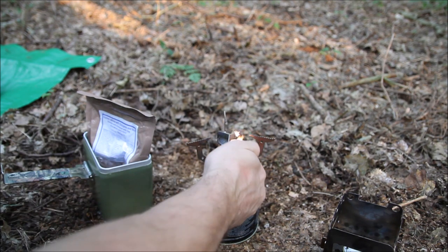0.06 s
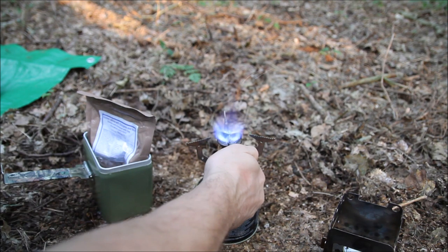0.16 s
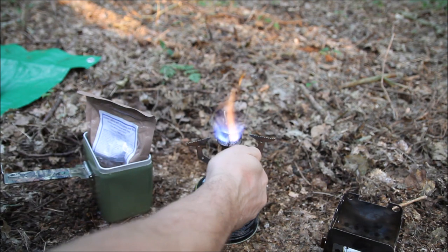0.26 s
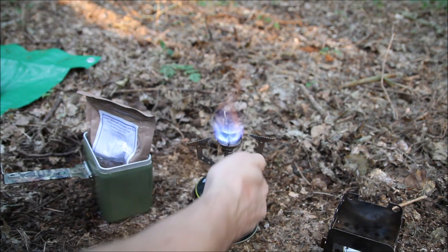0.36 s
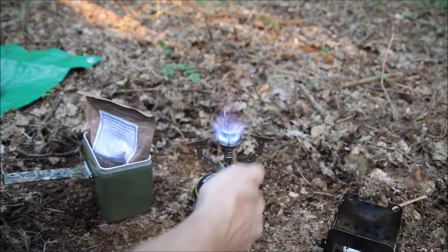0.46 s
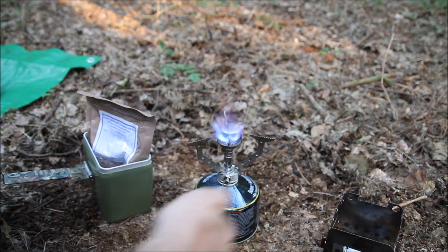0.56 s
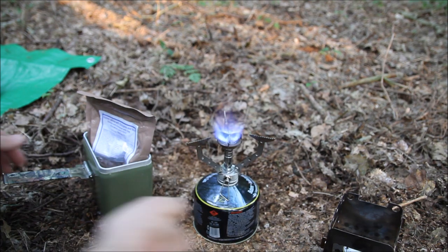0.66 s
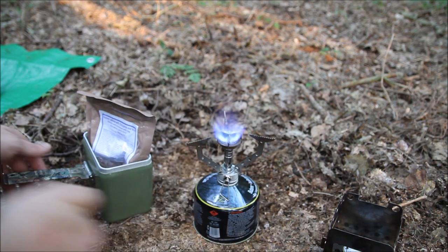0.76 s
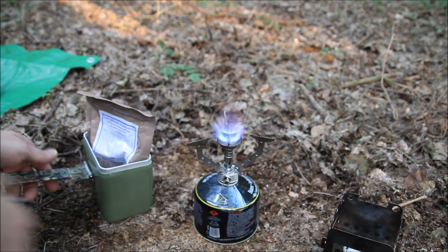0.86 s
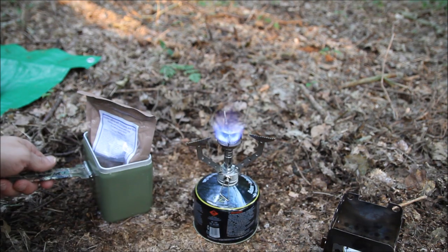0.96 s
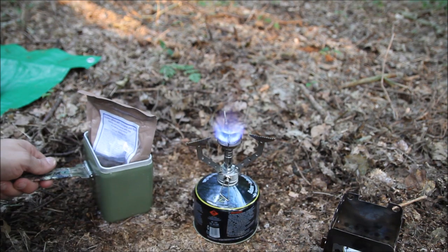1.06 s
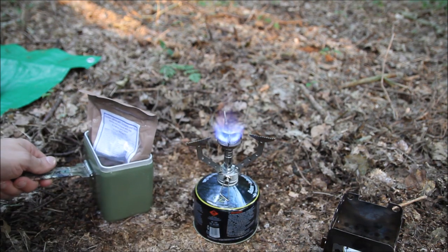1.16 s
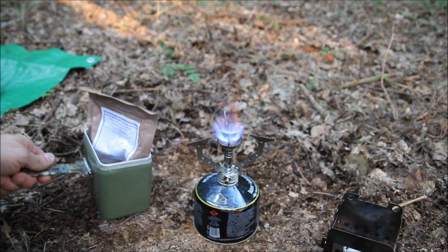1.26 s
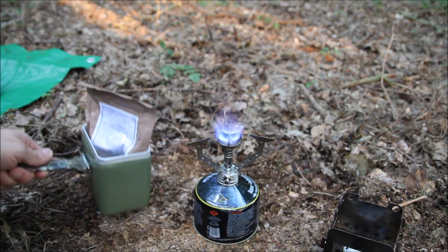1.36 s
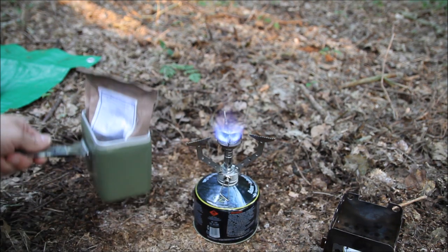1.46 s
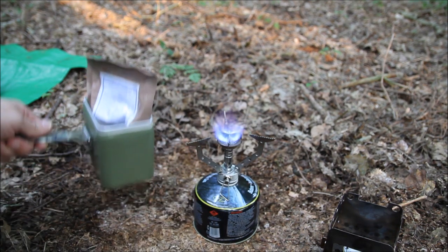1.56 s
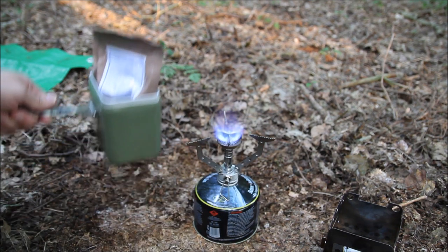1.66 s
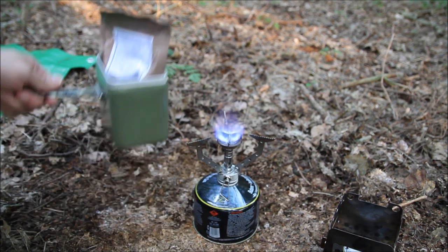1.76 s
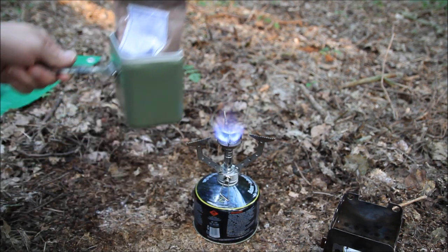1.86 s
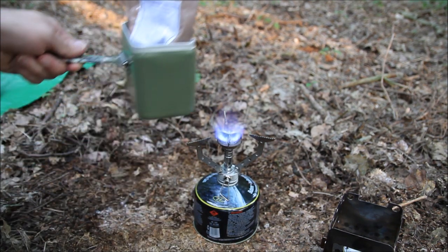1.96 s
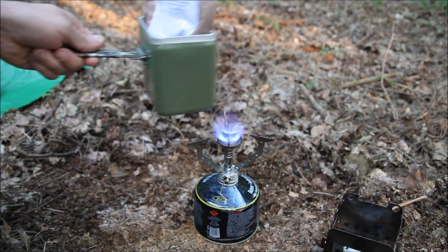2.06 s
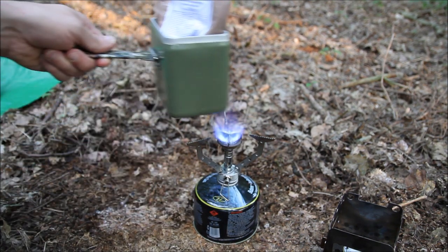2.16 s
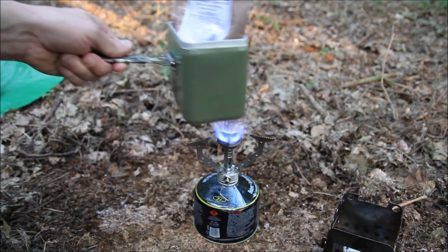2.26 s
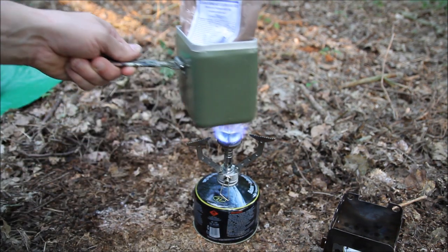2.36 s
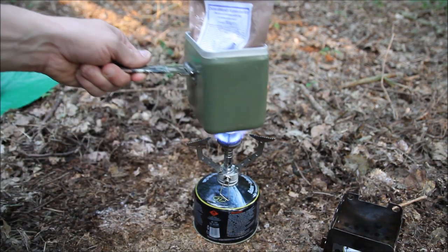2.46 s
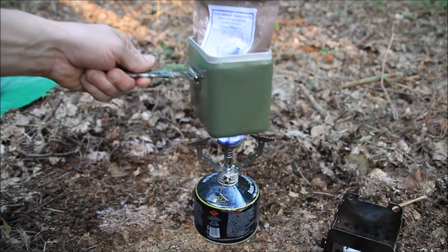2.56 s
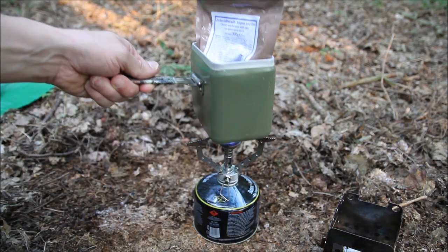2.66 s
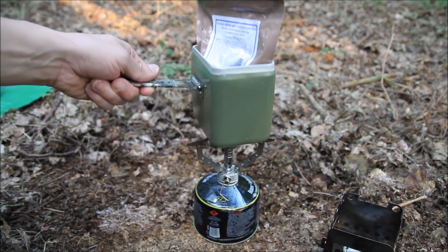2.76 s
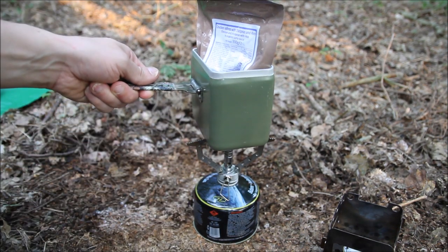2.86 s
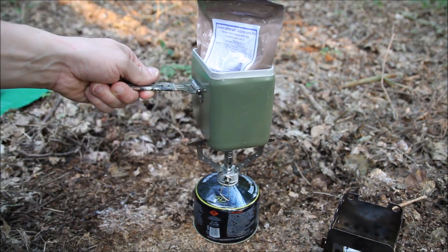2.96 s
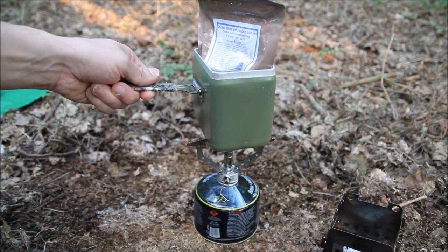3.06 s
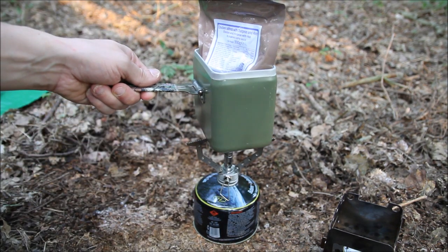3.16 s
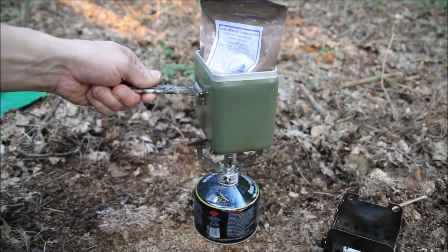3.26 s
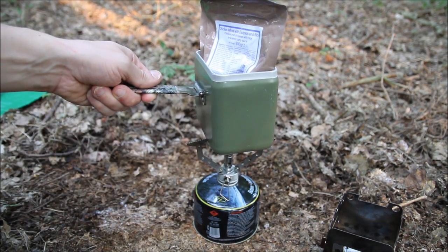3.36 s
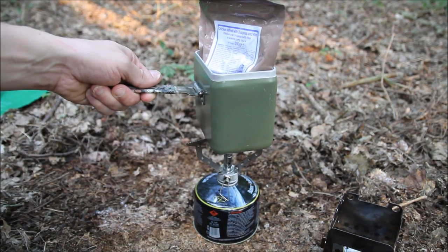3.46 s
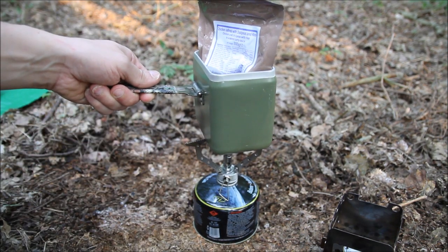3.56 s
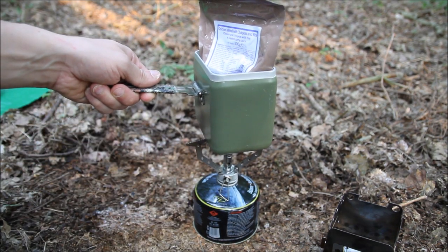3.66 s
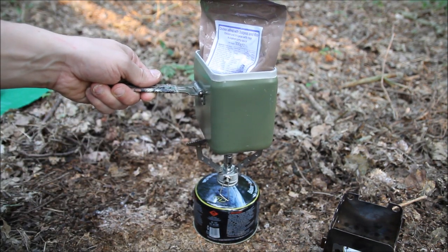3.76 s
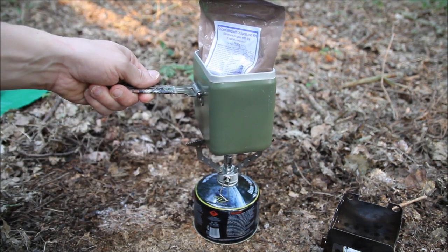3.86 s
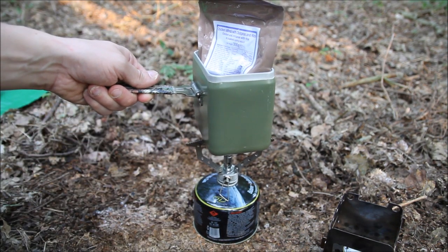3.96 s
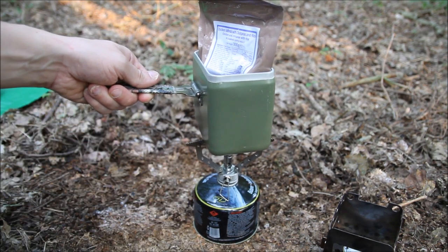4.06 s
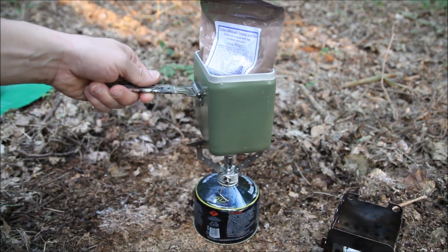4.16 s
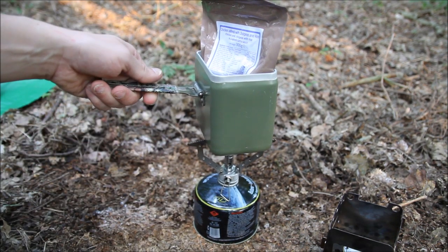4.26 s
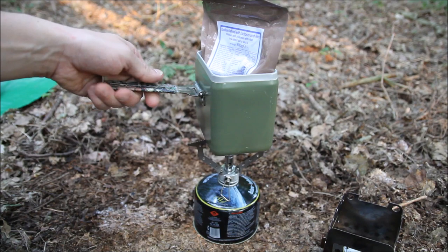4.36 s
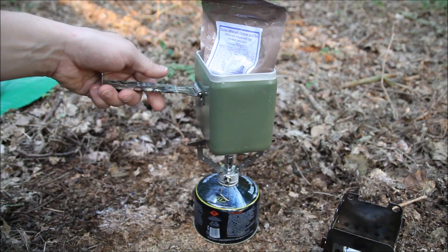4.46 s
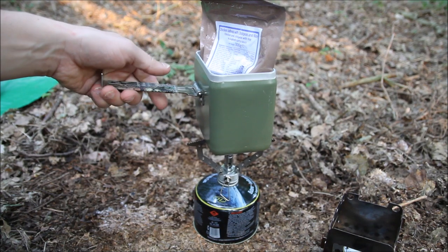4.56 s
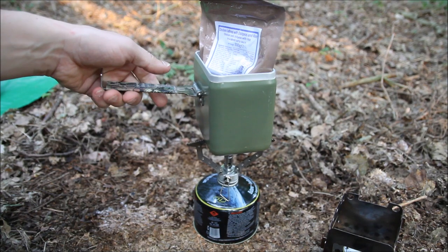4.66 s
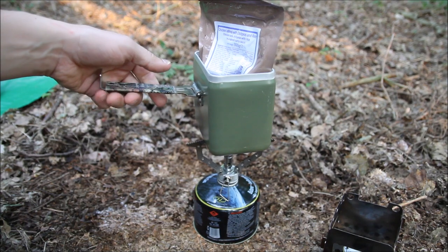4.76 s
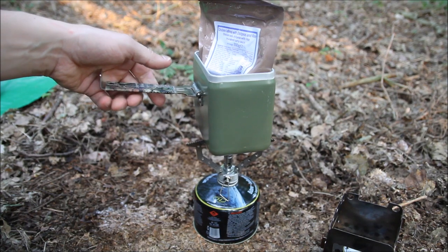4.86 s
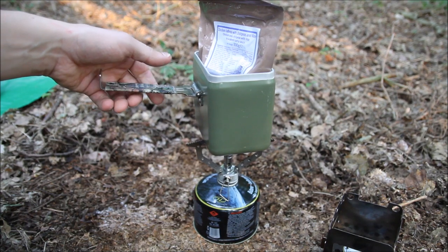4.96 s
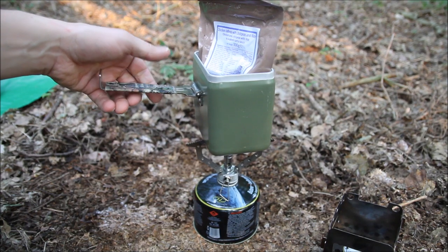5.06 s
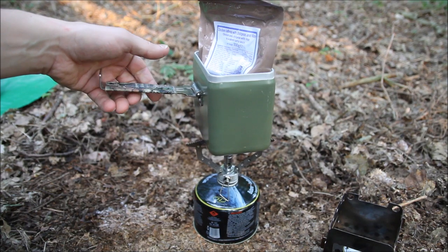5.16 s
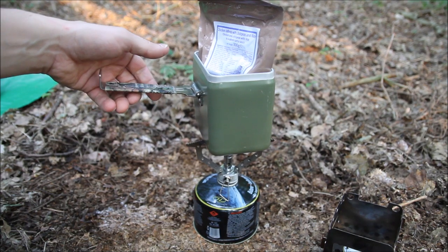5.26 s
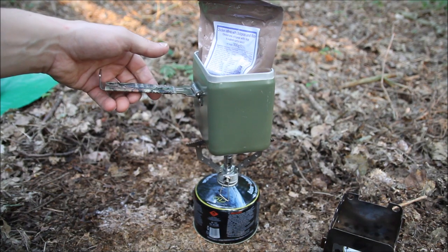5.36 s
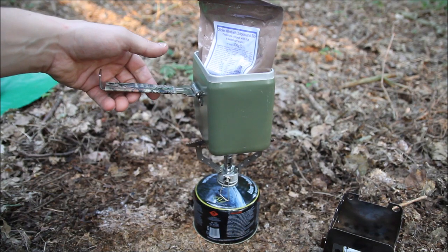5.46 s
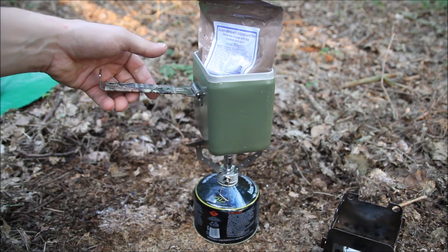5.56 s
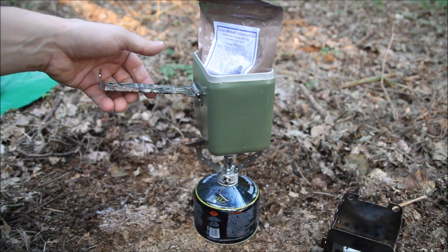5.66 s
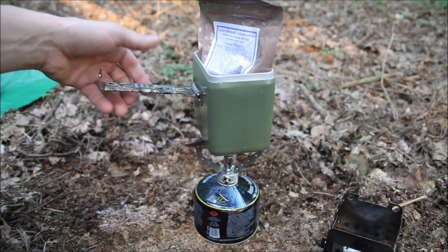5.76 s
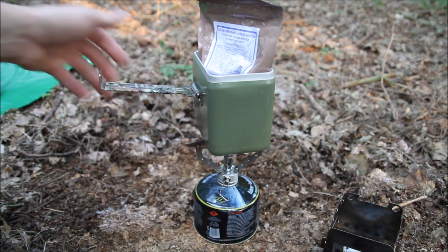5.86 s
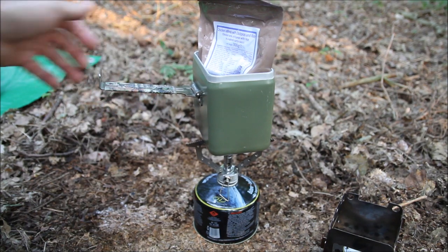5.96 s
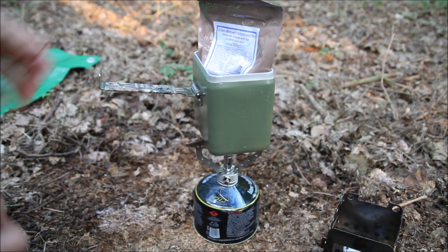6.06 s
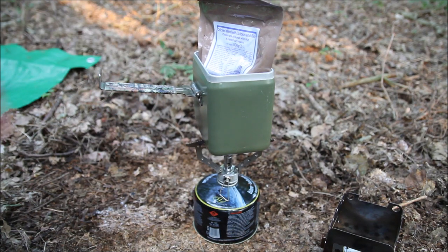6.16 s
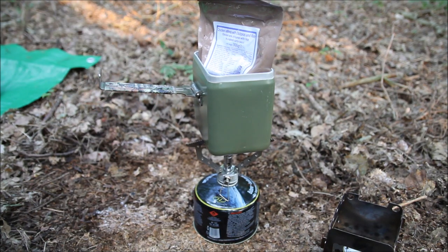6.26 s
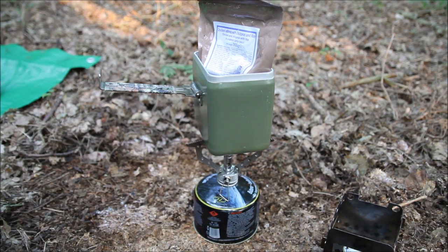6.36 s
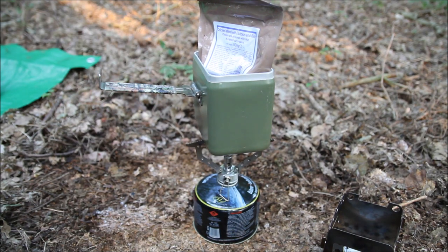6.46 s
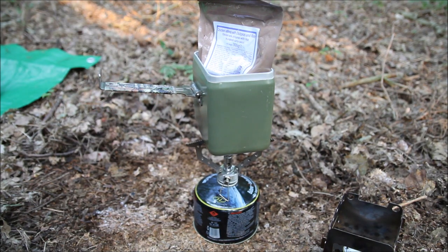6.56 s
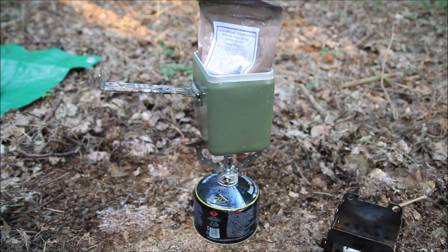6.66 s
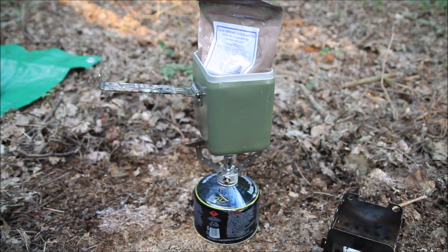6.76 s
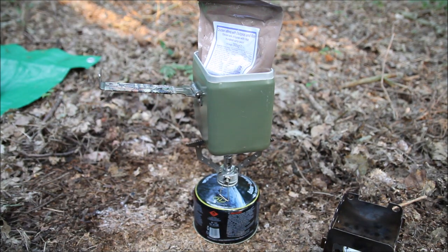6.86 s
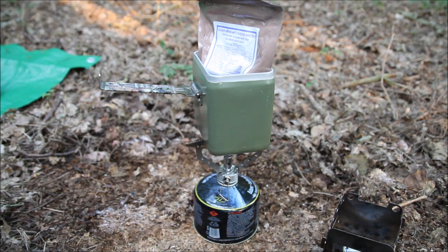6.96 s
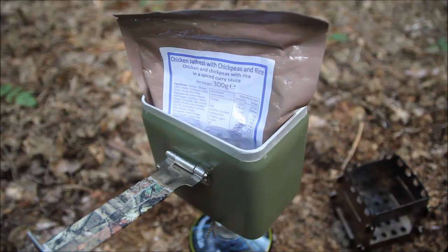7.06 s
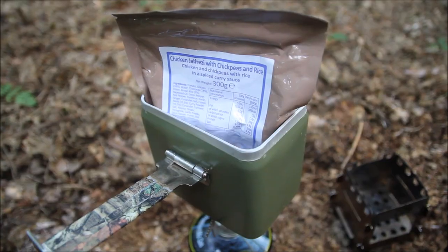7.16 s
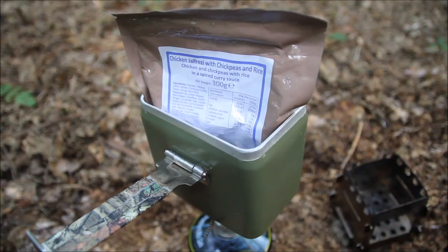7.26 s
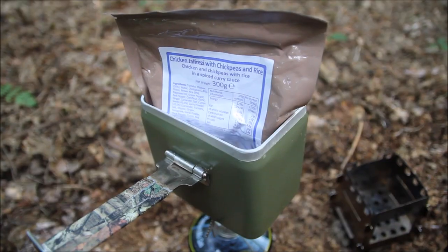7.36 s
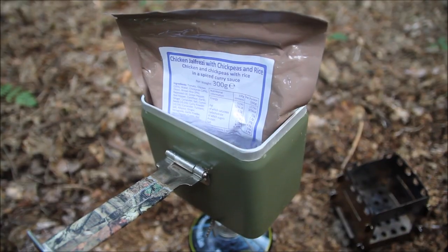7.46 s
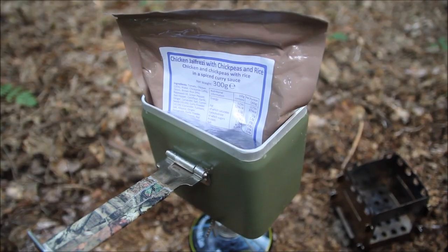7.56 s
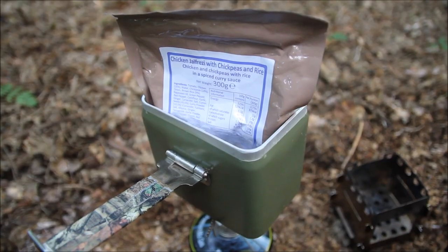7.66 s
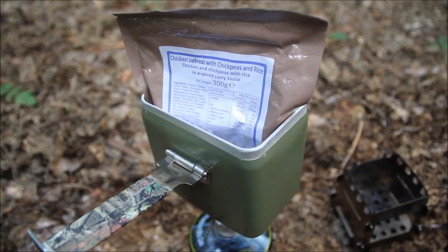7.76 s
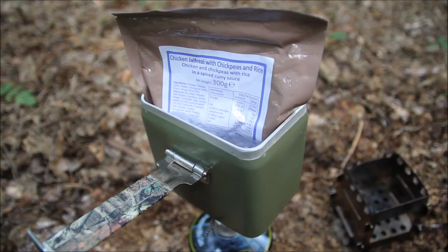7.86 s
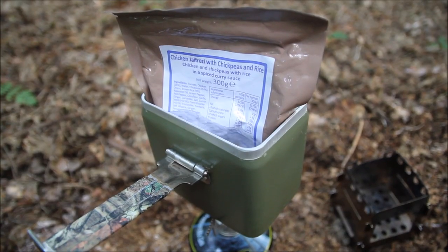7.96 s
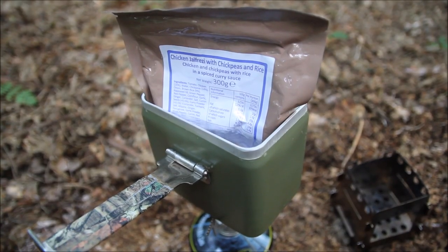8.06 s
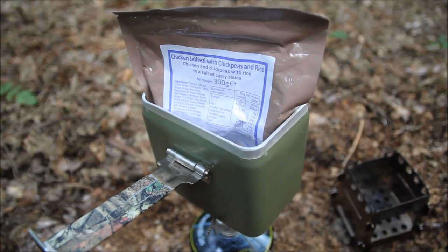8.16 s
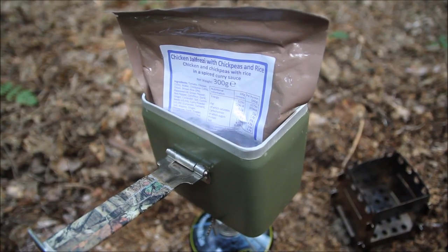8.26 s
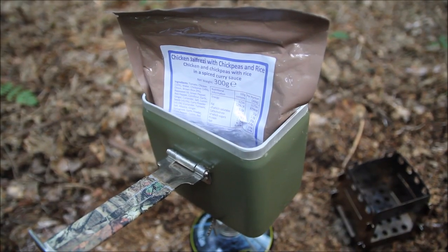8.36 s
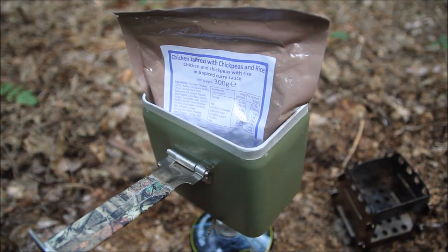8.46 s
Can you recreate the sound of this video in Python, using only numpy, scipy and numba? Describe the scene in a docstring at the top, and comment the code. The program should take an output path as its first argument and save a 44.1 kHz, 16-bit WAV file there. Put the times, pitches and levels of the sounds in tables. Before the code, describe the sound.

Dry outdoor mono, close to a portable gas burner. From 0 s thin, bright cold gas hisses, with a faint low thud at the very start. At 0.15 s the igniter gives a sharp, bright, rattling snap, and by 0.18 s the gas catches with a short deep whump. A loud, dense, fluttering roar with low rumble and airy jet hiss runs on. Between 0.4 and 1.1 s its tone sweeps downward, phaser-like, as the arm withdraws; from 1.5 to 2.8 s it shifts hollowly as the pot is lifted onto the flame, then holds steady. Around 6 s the roar dips briefly and recolours as the hand leaves; two tiny high ticks sound at 6.27 s. At 7.1 s it cuts off for a tiny gap, then a far quieter, duller low flame continues to 8.5 s with fine fizz and irregular water ticks, stronger near 7.5, 8.0 and 8.33 s.

```python
"""Gas hisses from a camping stove on a forest floor, a spark snaps and the flame lights with a whump and roars.
An arm swings a pot onto the flame; short echoes from arm, pot and ground comb the roar and change by pose.
After a short silence the stove is heard turned down, from above the pot, where warming water ticks.
Gas and flame are coloured noise with a fluttering level; snaps, thuds and ticks are sines that die away."""
import sys
import numpy as np
from scipy import signal
from scipy.fft import rfft, irfft, next_fast_len
from scipy.io import wavfile
from scipy.ndimage import map_coordinates
from numba import njit

SR = 44100
rng = np.random.default_rng(int(sys.argv[2]) if len(sys.argv) > 2 else 0)


def store_wav(level_fs):
    """Save 16-bit WAV to argv[1]."""
    pcm = np.round(np.clip(np.atleast_2d(level_fs), -1, 1) * 32767)
    wavfile.write(sys.argv[1], SR, pcm.T.astype(np.int16))


N = 375732  # length in samples

SPARK_S = 0.1529        # the igniter snaps
CATCH_RISE_S = 0.013    # time the flame takes to spread over the burner


def full_flame():
    """Burning gas is turbulent: a fluttering rumble, the roar, and the hiss of the jet."""
    # full flame, one row per pose: [rumble level/dB, roar level/dB, jet hiss level/dB], before the echoes
    flame_levels = [(-27, -22.5, -34), (-26, -24.5, -33.5), (-24.5, -24, -30.5), (-25.5, -25, -31),
                    (-25, -26.5, -33.5), (-24, -26.4, -33), (-24, -29, -33.5)]
    # colour of the rumble: [f/Hz, level/dB per Hz]
    rumble_colour = [(18, -58), (30, -32.5), (93, -8.5), (184, 1.5), (368, 0.5), (484, -10), (520, -17),
                     (680, -38), (1140, -120)]
    # colour of the roar: [f/Hz, level/dB per Hz]
    roar_colour = [(330, -30.0), (480, -4.1), (630, 1.0), (720, -.5), (900, -6.0), (1250, -0.1),
                   (1800, -5.6), (2100, -7.9), (2450, -4.9), (3100, -3.9), (3600, -14.7), (4300, -40.0)]
    # colour of the jet hiss: [f/Hz, level/dB per Hz]
    jet_colour = [(3000, -32), (3600, -5), (4350, 0.0), (5550, -7), (6100, -5.5), (6700, -9.5), (7150, -8),
                  (8000, -14.5), (8600, -9), (9250, -6), (10200, -14), (11200, -19.5), (12100, -17),
                  (12700, -19.5), (13200, -24), (15700, -27)]
    catch_s = 0.1632

    rumble_db, roar_db, jet_db = by_pose(flame_levels)
    rumble = from_db(rumble_db) * turbulence(rumble_colour, flutter_db=0.8, rate_hz=94)
    roar = from_db(roar_db) * turbulence(roar_colour, flutter_db=0.85, rate_hz=20.5)
    jet = from_db(jet_db) * turbulence(jet_colour, flutter_db=0.9, rate_hz=14)

    flare = swell(0.181, width_s=0.0054, db=3)   # the gas cloud flares as it lights
    drop = swell(6.035, width_s=0.023, db=-6)    # rumble and roar drop briefly in level
    burning = (rumble + roar) * drop * flare
    return surroundings((burning + jet) * ramp(catch_s, CATCH_RISE_S))


def lighting():
    """Cold gas hisses until it catches; the igniter snaps; the gas cloud lights with a whump."""
    # colour of the cold gas: [f/Hz, level/dB per Hz]
    cold_gas_colour = [(35, -55), (60, -13), (1430, -23), (1600, -19), (2020, -20), (3700, -12.5),
                       (4260, -3), (5250, -12), (6040, -4.5), (7450, -25), (9850, -18), (15700, -37)]
    # ringing tones of the igniter: [f/Hz, level/dB relative to the snap, time to lose 60 dB/s]
    spark_modes = [(4300, -1.5, 0.0037), (9350, -0.5, 0.003), (1200, -12, 0.0018), (1900, -13, .002),
                   (2800, -11, 0.0025), (3500, -4, .003), (5500, -12, .003), (6770, -14, 0.0032),
                   (12200, -5, 0.003), (13800, -14, .003)]
    cold_gas_db, spark_db = -32, -8
    # after the snap the igniter's parts rattle, weaker at each contact
    contacts, rattle_gap_s, rattle_loss_db = 9, 0.00076, 2.5

    gas = from_db(cold_gas_db) * turbulence(cold_gas_colour, flutter_db=1.5, rate_hz=96)
    gas = gas * (1 - ramp(SPARK_S, 2 * CATCH_RISE_S))

    # each contact pushes every tone up or down at random
    pushes = rng.choice([-1, 1], (contacts, len(spark_modes)))
    snap = np.zeros(N)
    for i, row in enumerate(pushes):
        contact_s = SPARK_S + i * rattle_gap_s
        contact_db = spark_db - i * rattle_loss_db
        for push, (hz, mode_db, t60_s) in zip(row, spark_modes):
            snap += push * blip(contact_s, contact_db + mode_db, hz, t60_s)

    # a low thud dies away as the gas hisses
    thud = blip(0, -35, hz=151, t60_s=0.059)
    # the minus sign turns the whump's first push the other way
    whump = -blip(0.180, -11.5, hz=115, t60_s=0.05)
    return gas + snap + thud + whump


def handle_ticks():
    """The released pot handle ticks: short rings that die away in a hundredth of a second."""
    # ticks of the handle: [t/s, level/dB at the start of the ring, f/Hz]
    handle_rings = [(6.2645, -23, 6100), (6.2735, -19, 6700)]
    return sum(blip(s, db, hz, t60_s=0.01) for s, db, hz in handle_rings)


def low_flame():
    """The same burner turned down and screened by the pot: quieter noise in duller colours."""
    # low flame over time: [t/s, rumble level/dB, roar level/dB, hiss level/dB]
    low_levels = [(7.13, -36, -43, -54.5), (7.37, -39, -44, -55.5), (7.814, -39, -43.5, -55),
                  (8.52, -39.5, -44, -54.5)]
    # colour of the low rumble: [f/Hz, level/dB per Hz]
    low_rumble_colour = [(18, -56), (30, -30), (140, -4), (283, -2.5), (296, -2), (375, -14), (450, -6.5),
                         (580, -29), (990, -120)]
    # colour of the low roar: [f/Hz, level/dB per Hz]
    low_roar_colour = [(250, -40), (420, -8), (486, -6.5), (517, -1.5), (763, -10), (1230, -7.5),
                       (1800, -25), (2340, -56.5), (3960, -120)]
    # colour of the low hiss: [f/Hz, level/dB per Hz]
    low_hiss_colour = [(1000, -31), (1700, -8), (2170, -1), (2730, 0), (3780, -4.5), (5050, -0.5),
                       (6370, -6.5), (8990, -8), (11000, -18), (15700, -22)]

    rumble_db, roar_db, hiss_db = in_time(low_levels)
    rumble = from_db(rumble_db) * turbulence(low_rumble_colour, flutter_db=-1.0, rate_hz=18)
    roar = from_db(roar_db) * turbulence(low_roar_colour, flutter_db=1.0, rate_hz=24)
    hiss = from_db(hiss_db) * turbulence(low_hiss_colour, flutter_db=1.0, rate_hz=16)
    return rumble + roar + hiss


def warming_pot():
    """Small bubbles collapse on the hot base: a few clear ticks over a random fizz."""
    # clear ticks: [t/s, level/dB at the start of the ring, f/Hz]
    clear_ticks = [(7.2275, -36, 5000), (7.2520, -27, 9500), (7.2545, -33, 7000), (7.324, -28, 2100),
                   (7.349, -33, 2500), (7.3545, -29, 1800), (7.379, -41, 2300), (7.457, -34, 1100),
                   (7.5089, -22, 540), (7.512, -27, 520), (7.554, -39, 2800), (7.5915, -36, 4300),
                   (7.615, -39, 3600), (7.6804, -32, 1700), (7.6929, -32, 1600), (7.715, -36, 2800),
                   (7.74, -28, 600), (7.766, -37, 3000), (7.788, -37, 5000), (7.85, -29, 1500),
                   (7.956, -36, 2700), (7.984, -37, 4000), (7.9910, -34, 4500), (7.998, -18.5, 1470),
                   (8.0444, -32, 1600), (8.2226, -29, 2800), (8.3287, -28, 750), (8.329, -20, 1390)]
    fizz_per_s, fizz_db = 110, -60
    # cycles until a ring has lost 60 dB
    tick_cycles, fizz_cycles = 7.1, 7.6

    # bubbles differ by up to 9 dB and push either way
    sizes = from_db(3.0 * np.minimum(rng.exponential(1, N), 3)) * rng.choice([-1, 1], N)
    born = rng.random(N) < fizz_per_s / SR
    pitches = np.geomspace(1300, 5500, 10)
    pitch_number = rng.integers(0, 10, N)
    fizz = np.zeros(N)
    for k, hz in enumerate(pitches):
        fizz += ring(sizes * born * (pitch_number == k), hz, fizz_cycles / hz)

    ticks = sum(blip(s, db, hz, tick_cycles / hz) for s, db, hz in clear_ticks)
    return from_db(fizz_db) * rms_one(fizz) + ticks


def surroundings(x):
    """Direct sound plus echoes (soft and far surfaces return less treble), then drifting bands of colour."""
    # Echoes of things near the flame, named for the likeliest surface, one row per pose:
    # [lag/ms, share of the direct sound], a negative share is an inverted echo
    burner = [(0.25, -0.0062), (0.323, -0.38), (0.33, -0.073), (0.19, 0.0042), (0.254, 0.12), (0.27, 0.14),
              (0.3, 0.075)]
    # gas canister: [lag/ms, share]
    canister = [(0.56, 0.033), (0.63, -0.11), (0.63, -0.14), (0.61, -0.15), (0.597, -0.011),
                (0.566, -0.064), (0.55, -0.18)]
    # base of the pot: [lag/ms, share]
    pot_base = [(0.734, 0.12), (0.8, 0.19), (0.72, -0.17), (0.716, -0.23), (0.69, 0.082), (0.615, 0.073),
                (0.64, 0.2)]
    # side of the pot: [lag/ms, share]
    pot_side = [(1.26, 0.031), (1.37, 0.27), (1.27, 0.14), (1.16, 0.13), (1.186, 0.085), (1.16, 0.11),
                (1.16, 0.14)]
    # hand: [lag/ms, share]
    hand = [(1.64, 0.14), (1.83, 0.074), (1.96, 0.1), (2, 0.12), (1.67, 0.15), (1.67, 0.12), (1.95, 0)]
    # forest floor: [lag/ms, share]
    ground = [(3.0, 0), (3.0, 0), (3.0, 0), (3.0, 0.07), (2.93, 0.14), (2.955, 0.21), (3.0, 0.0077)]
    # forearm at the valve, drawing back, on the pot handle, gone: [t/s, lag/ms, share]
    forearm = [(.36, .07, 0), (.48, .088, .5), (.62, .125, .65), (.72, .168, .62), (.78, .215, .38),
               (.83, .28, .5), (.88, .325, .52), (.94, .385, .36), (1.0, .42, .45), (1.09, .46, .36),
               (1.2, .436, .36), (1.4, .42, .48), (1.55, .41, .55), (2.45, .42, .55), (2.75, .406, .34),
               (5.9, .407, .34), (6.04, .435, .38), (6.25, .65, 0)]
    # sleeve drawing away: [start t/s, first lag/ms, lag growth/ms per s, share, fade-in/s, dulled above f/Hz]
    withdrawals = [(5.8, .95, .81, .16, .4, 4500)]
    # bands of the colour that rise, fall and drift over time:
    # [width/octaves, rows of (t/s, centre f/Hz, gain/dB)]
    shades = [ (0.069, [(1.0, 3400, .1), (1.25, 3380, -7), (1.55, 3400, -9), (1.8, 3370, -5),
              (1.95, 3380, -2), (2.1, 3380, -6), (2.47, 3420, -10), (2.68, 3450, .1), (2.82, 3500, -5),
              (3.2, 3520, .1)]), (.06, [(1.1, 1250, -4), (1.3, 1300, -6), (1.7, 1350, -9), (2.1, 1330, -6),
              (2.4, 1400, -9), (2.6, 1450, -3.5), (2.8, 1480, .1)]), (0.33, [(.2, 1580, 5), (.45, 1530, 5),
              (.58, 1500, 2.5), (1.0, 1500, 2.5), (1.15, 1600, 4), (1.35, 1510, 6.5), (1.7, 1400, 3),
              (2.2, 1460, 5.5), (2.5, 1320, 3.5), (2.8, 1400, 2)]), (0.15, [(.2, 670, 3.5), (.42, 680, 5.5),
              (.55, 640, 0.5), (.7, 656, 4), (1.15, 676, 1.5), (1.6, 600, 1.5), (2.2, 670, 2.5),
              (3.1, 595, 2.5), (3.6, 600, .1)]), (0.11, [(1.4, 1230, 2), (1.8, 1240, 6), (2.1, 1240, 5),
              (2.45, 1260, 6), (2.65, 1300, .1)]), (0.37, [(.35, 1200, .1), (.62, 1200, 0), (.77, 800, 4),
              (.9, 900, 3)]), (0.71, [(.2, 300, 0), (2.0, 310, -0.5), (3.6, 375, 0.5), (4.3, 370, -0.7),
              (5.2, 375, 1.5), (5.6, 333, -2.5), (5.9, 330, -0.5), (6.25, 312, 5), (6.5, 313, 3.5),
              (6.7, 330, -2.5), (7.1, 330, 0.7)]), (1, [(.2, 480, 0.5), (.6, 496, -5), (.9, 500, 0.7),
              (1.3, 500, -2), (1.9, 585, -2), (2.4, 500, -.5), (2.75, 516, -2.5), (3.1, 520, .1)]),
              (0.28, [(1.8, 1050, 2), (2.15, 1050, 3), (2.8, 1010, 3.5), (3.5, 1100, 3), (4.0, 1100, 1),
              (6.1, 950, 1.5), (6.3, 885, 4), (6.55, 680, 1), (6.8, 644, -4)]), (0.33, [(.55, 1500, 1),
              (.7, 1480, 5.5), (.8, 1900, 1.5), (.9, 1750, -2), (1.03, 1420, -1), (1.15, 1750, 3.5),
              (1.5, 1650, -0.5), (2.05, 1800, 4), (2.5, 1550, 1.5), (2.7, 1600, 2), (2.8, 1750, -2),
              (3.0, 1750, 0), (3.2, 1700, -0.5), (5.0, 1700, 3), (6.0, 1650, 2.5)]),
              (0.24, [(.25, 3820, -0.5), (.4, 3940, 8.5), (.58, 3400, 8), (.7, 3240, -3), (.95, 3500, 2),
              (1.2, 3700, 2.5), (2.1, 3720, 7.5), (2.8, 3830, 4), (3.3, 3700, 0.5), (5.8, 3650, -1),
              (6.0, 3700, -9), (6.2, 3700, 3), (6.9, 3800, -3)]), (0.076, [(.6, 5500, -3), (.8, 5500, 4.5),
              (.95, 6300, 7), (1.1, 5500, 2.5), (2.7, 5500, -1.5), (5.9, 5300, 0), (6.3, 5200, 5.5),
              (6.9, 5600, -2)]), (0.16, [(5.95, 600, 0), (6.1, 520, -4), (6.33, 496, -9), (6.52, 457, -12),
              (6.65, 420, -7.5), (7.1, 375, -5.5)]), (.1, [(6.05, 800, .1), (6.15, 720, -4), (6.4, 590, -8),
              (6.5, 540, 3)]), (0.36, [(6.3, 670, -2), (6.6, 577, 5), (7.1, 523, 6)]),
              (.12, [(5.95, 1200, -2), (6.15, 1140, -4), (6.4, 1030, -4), (6.6, 930, -6), (6.8, 870, -7),
              (6.92, 850, -1), (7.1, 760, -3)]), (0.2, [(6.1, 1550, -10), (6.2, 1650, -1), (6.45, 1460, 4),
              (6.6, 1325, 3.5), (6.75, 1400, -2), (6.95, 1590, 4.5), (7.1, 1500, 1.5)]),
              (0.22, [(.2, 2210, 6), (.55, 2200, 4), (.8, 2200, -3.5), (1.2, 2070, 3.5), (1.7, 2190, 1),
              (2.05, 2250, 4), (2.3, 2230, 0.5), (2.4, 2200, -3), (2.57, 2000, 6.5), (2.72, 2100, 6),
              (2.9, 2020, -1.5), (3.1, 2086, 2), (4.0, 2080, -5), (5.0, 2150, -5.5), (5.9, 2040, -4.5),
              (6.05, 2200, -2), (6.22, 2020, -8), (6.38, 2050, -4), (6.55, 2010, -7), (6.8, 1900, -7),
              (6.95, 2230, -4), (7.1, 2200, -7)]), (0.11, [(.2, 3000, -5.5), (.8, 3300, -2.5),
              (1.3, 3100, -2), (2.3, 3320, 0.6), (3.1, 3330, 4), (5.6, 3280, 3.5), (6.0, 3250, 0),
              (6.3, 3000, -0.5), (6.6, 3370, 5), (7.1, 3400, 3)]), (0.21, [(.2, 4300, 4), (.6, 4600, 1),
              (1.0, 4470, -1.5), (1.9, 4430, 0.5), (2.05, 4400, -2), (2.15, 4300, 5), (2.3, 4300, -1.5),
              (2.42, 4150, -9), (2.7, 4300, -2), (2.9, 4200, 2.5), (3.6, 4800, 1), (4.1, 4720, -4.5),
              (4.9, 4300, 2), (5.3, 5430, -1), (6.15, 4570, 3), (6.45, 4600, 2), (6.7, 4700, -2),
              (7.1, 4800, -1.5)]), (0.15, [(.4, 6450, 5), (.6, 6500, 6), (1.0, 6300, 2), (1.5, 5960, 5),
              (2.15, 6350, 8), (2.6, 6200, -4), (3.3, 6100, 4), (4.0, 6100, -5), (5.1, 6500, -5),
              (5.7, 6660, 0), (6.15, 6070, 3.5), (7.1, 6000, -2.5)]), (0.075, [(1.0, 8000, 5.5),
              (1.4, 8060, 3), (2.5, 8100, 5.5), (3.6, 8200, 4), (4.2, 8200, -3), (5.0, 7900, -2.3)]),
              (0.13, [(1.1, 8800, -3), (1.3, 8700, 0), (1.7, 8900, -2.5), (2.4, 9600, 0), (3.4, 9500, 3),
              (4.1, 9200, -1), (4.6, 9000, 5), (5.5, 9200, -.5), (6.2, 9500, 2.5), (7.1, 9000, -2.5)]),
              (.08, [(1.0, 7000, .1), (1.3, 7200, -0.5), (2.2, 7200, -2), (2.6, 7050, 3), (3.2, 7300, 4),
              (3.6, 7400, 4), (4.0, 7350, -5), (4.5, 7050, 4.5), (5.3, 7300, -1), (5.7, 7400, -2),
              (6.4, 7600, 4), (6.8, 7300, -3)]), (0.058, [(1.0, 8600, 5), (1.3, 8600, 3.5), (1.9, 8600, -3),
              (2.9, 8900, -5), (3.4, 8650, -5), (4.1, 8550, -6), (4.5, 8500, -1), (5.0, 8650, -6),
              (5.6, 8500, 5), (6.3, 8300, 5), (7.1, 8500, -2)]), (0.043, [(1.1, 10200, -3),
              (1.6, 10200, -5), (2.2, 10300, -7), (2.6, 10500, 6), (3.5, 10300, 2.5), (4.2, 10200, 1),
              (4.6, 10200, -3), (5.1, 10400, 0), (5.7, 10100, -2), (7.1, 10400, -2.5)]),
              (.05, [(1.2, 11200, -1.5), (1.6, 11100, -3.5), (2.3, 11200, -4.5), (2.9, 11400, -5),
              (3.7, 11400, -3.5), (4.3, 11100, 7), (4.7, 11200, 1.5), (5.0, 11200, -2), (5.8, 11100, -4),
              (6.4, 11200, -2)]), (.06, [(1.2, 12200, -4), (1.6, 12400, 7), (1.95, 12300, 3.5),
              (2.25, 12300, -7), (2.9, 12300, -2), (3.4, 12600, 5.5), (3.9, 12600, 2), (4.5, 12500, 3.5),
              (5.0, 12300, 2), (5.6, 11850, 4), (6.1, 11900, 1), (6.5, 12600, 2.5), (7.1, 12400, .1)]),
              (0.58, [(.2, 13000, 3), (1.0, 13600, 3.5), (1.6, 12500, -5), (2.5, 14000, 0),
              (3.8, 14000, -3), (4.5, 13800, 0), (5.9, 14000, -6), (6.3, 13000, 1), (7.1, 13500, -9)])]

    # each surface with the frequency in Hz above which its echo is dulled
    near = [(burner, 11500), (canister, 6500), (pot_base, 8000),
            (pot_side, 5600), (hand, 4800), (ground, 3000)]
    heard = x + echo(x, *in_time(forearm), dull_hz=8500)
    for row in withdrawals:
        heard = heard + withdrawal(x, *row)
    for rows, dull_hz in near:
        heard = heard + echo(x, *by_pose(rows), dull_hz)
    for octaves, rows in shades:
        heard = shade(heard, octaves, rows)
    return heard


def echo(x, lag_ms, share, dull_hz):
    """A late, dulled copy from a surface: a longer path means a longer lag."""
    tremble_ms, sway_ms = 0.004, 0.005   # hands and flame are never still: quick and slow wander
    dull = signal.sosfilt(signal.butter(1, min(dull_hz, 20000), fs=SR, output="sos"), x)
    moving_lag_ms = lag_ms + tremble_ms * drift(8.5) + sway_ms * drift(0.53)
    # read the sound at positions between the samples
    late = map_coordinates(dull, [np.arange(N) - moving_lag_ms * SR / 1000], order=3)
    return share * late


def withdrawal(x, start_s, first_ms, ms_per_s, share, fade_in_s, dull_hz):
    """The echo of a limb that moves off at a steady pace: it fades in and its lag grows."""
    lag_ms = first_ms + ms_per_s * np.maximum(np.arange(N) / SR - start_s, 0)
    return echo(x, lag_ms, share * ramp(start_s, fade_in_s), dull_hz)


def shade(x, octaves, rows):
    """Lift or cut a band whose centre and depth follow the rows."""
    hz, db = in_time(rows)
    root = from_db(db / 2)
    damp = np.log(2) * max(octaves, 0.02) / root
    return moving_bell(x, np.tan(np.pi * hz / SR), damp, damp * (root * root - 1))


@njit
def moving_bell(x, warp, damp, lift):
    """State-variable filter: the input plus a share of its moving band."""
    out, a, b = np.empty_like(x), 0.0, 0.0
    for i in range(len(x)):
        band = (a + warp[i] * (x[i] - b)) / (1 + warp[i] * (warp[i] + damp[i]))
        low = b + warp[i] * band
        a, b = 2 * band - a, 2 * low - b   # memory for the next sample
        out[i] = x[i] + lift[i] * band
    return out


def turbulence(colour_rows, flutter_db, rate_hz):
    """Turbulent gas: noise of the given colour whose level flutters; rms 1."""
    size = next_fast_len(N)
    hz, db = np.transpose(colour_rows)
    grid_hz = np.maximum(np.arange(size // 2 + 1) * SR / size, 1)
    colour = from_db(np.interp(np.log(grid_hz), np.log(hz), db, left=-120, right=-120))
    noise = irfft(rfft(rng.standard_normal(size)) * colour, size)[:N]
    return rms_one(noise * from_db(flutter_db * drift(rate_hz)))


def drift(rate_hz):
    """Slow chance: noise smoothed twice by a one-pole low-pass; spread 1."""
    step, settle = 40, 2000   # samples per slow value; slow values dropped while the filter settles
    r = np.exp(-2 * np.pi * rate_hz * step / SR)
    noise = rng.standard_normal(N // step + settle + 2)
    slow = signal.lfilter([1], [1, -2 * r, r * r], noise)[settle:]
    return np.interp(np.arange(N) / step, np.arange(len(slow)), rms_one(slow))


def ring(clicks, hz, t60_s):
    """A struck body: each unit click starts a sine of height 1 that loses 60 dB in t60_s."""
    r = from_db(-60 / (max(t60_s, 0.0005) * SR))
    w = 2 * np.pi * hz / SR
    # the tiny offset keeps the dying ring from reaching numbers that compute slowly
    return signal.lfilter([0, np.sin(w)], [1, -2 * r * np.cos(w), r * r], clicks + 1e-18)


def blip(at_s, start_db, hz, t60_s):
    """One short damped ring, its first push downward."""
    out, at = np.zeros(N), round(at_s * SR)
    click = np.zeros(min(SR // 10, N - at))
    click[0] = -from_db(start_db)
    out[at:at + len(click)] = ring(click, hz, t60_s)
    return out


def swell(at_s, width_s, db):
    """A brief bell-shaped change of gain."""
    return from_db(db * np.exp(-((np.arange(N) / SR - at_s) / width_s) ** 2))


def ramp(start_s, rise_s):
    """Zero before the start, then a straight rise to one."""
    return np.clip((np.arange(N) / SR - start_s) / max(rise_s, 1 / SR), 0, 1)


def by_pose(rows):
    """One row per pose, joined by straight lines."""
    # hand at the valve, arm drawing back, hand on the handle, pot lifted,
    # pot held on the burner, hand opened, hand gone: [held from t/s, held until t/s];
    # the handle and lifted-pot holds overlap
    poses = [(.2, 0.41), (.78, 0.85), (1.1, 1.76), (1.6, 2.32), (2.8, 4), (4.6, 6.1), (6.28, 7.1)]
    return in_time([(s, *row) for held, row in zip(poses, rows) for s in held])


def in_time(rows):
    """Every column after the first (the time), as one value per sample."""
    s, *columns = np.transpose(rows)
    return [np.interp(np.arange(N) / SR, s, column) for column in columns]


def from_db(db):
    """Decibels to gain."""
    return 10 ** (np.asarray(db) / 20)


def rms_one(x):
    """Scale to unit rms."""
    return x / np.sqrt(np.mean(x ** 2) + 1e-20)


def scene():
    """The loud part, a short silence, the quiet part."""
    # the loud part dies: [t/s, gain/dB]
    dying = [(7.089, 0), (7.0905, -13), (7.103, -17), (7.1105, -45)]
    resume_s = 7.1222

    loud = full_flame() + lighting() + handle_ticks()
    loud = loud * from_db(in_time(dying)[0]) * (1 - ramp(dying[-1][0], 0))
    quiet = (low_flame() + warming_pot()) * ramp(resume_s, 0.0004)
    return (loud + quiet)[None, :]


def record(dry):
    """A small microphone loses the deepest bass; the top is cut."""
    low_hz, cutoff_hz = 40, 16650
    thin = signal.sosfilt(signal.butter(2, low_hz, "high", fs=SR, output="sos"), dry)
    return signal.sosfilt(signal.cheby2(14, 60, cutoff_hz, fs=SR, output="sos"), thin)


dry = scene()
out = record(dry)
store_wav(out)
```